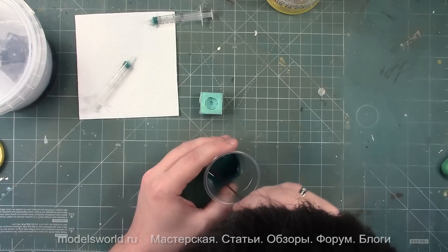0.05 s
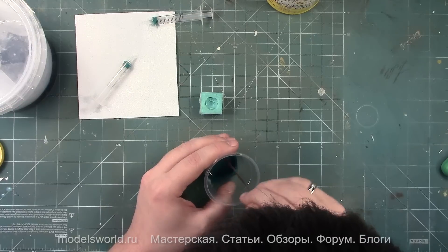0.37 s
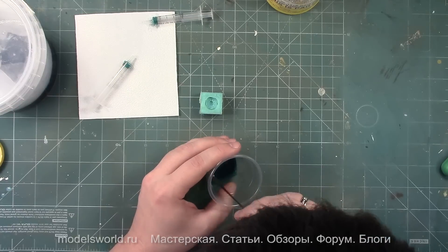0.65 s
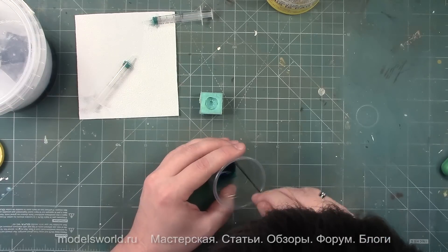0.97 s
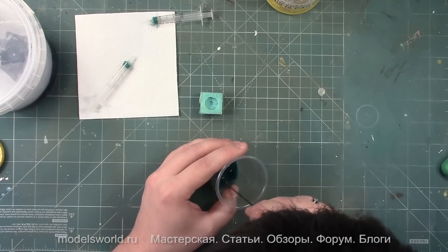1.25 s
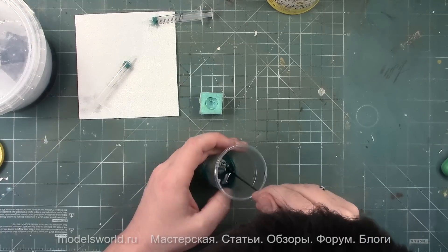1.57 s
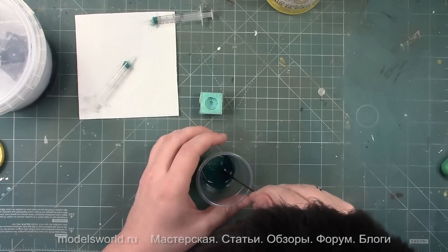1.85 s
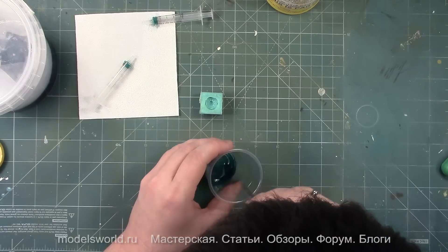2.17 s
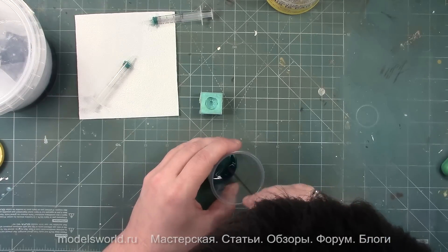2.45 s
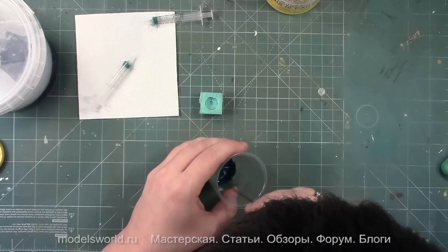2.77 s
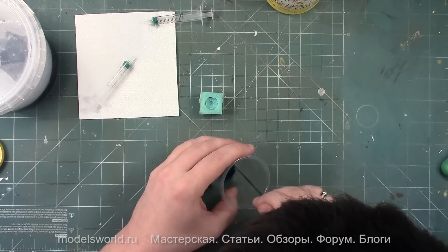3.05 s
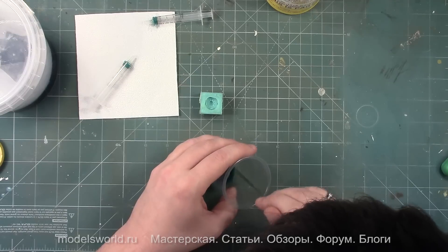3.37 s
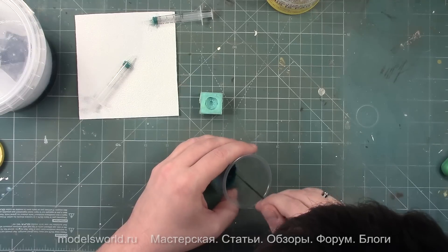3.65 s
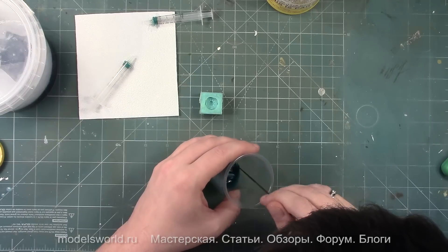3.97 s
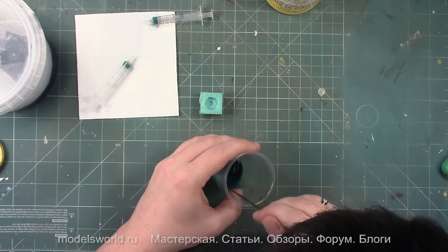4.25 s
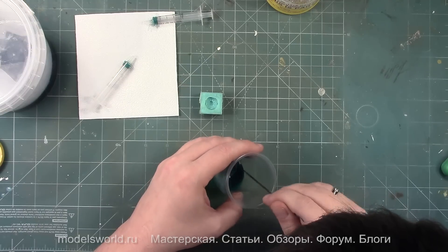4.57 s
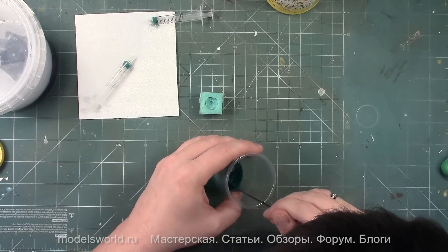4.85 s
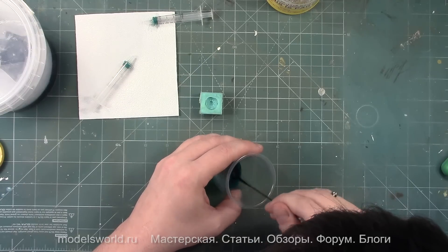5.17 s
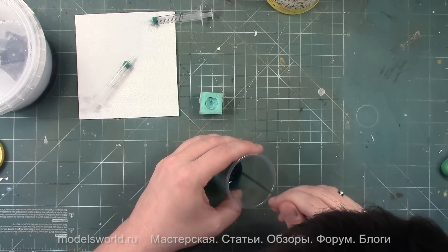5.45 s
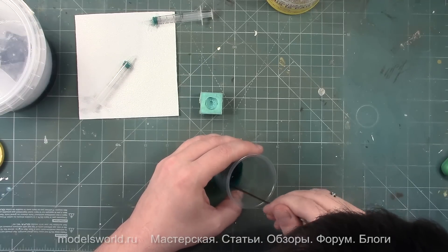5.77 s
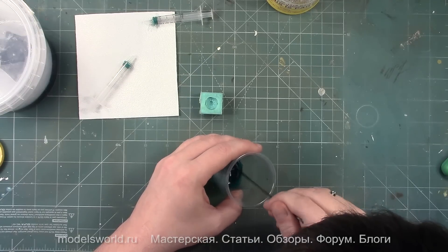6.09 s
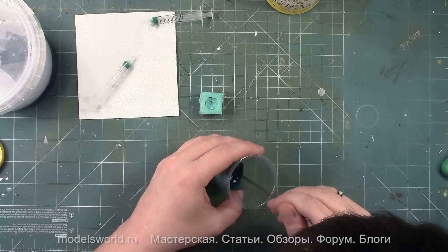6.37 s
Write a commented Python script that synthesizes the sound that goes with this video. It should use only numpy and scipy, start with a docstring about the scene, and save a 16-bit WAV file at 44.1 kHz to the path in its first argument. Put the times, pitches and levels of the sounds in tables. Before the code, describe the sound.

Close, uneven taps and short scrapes of a stick stirring liquid in a flimsy plastic cup, whose wall snaps a few times.

```python
"""Over a faint room rumble, a thin stick knocks and scrapes as it stirs a little liquid in a thin plastic cup.
The cup is hand-held above a worktable in a small room. Each turn drags along the wall in tiny slips and
knocks against it; wall and base ring briefly, with more thump when the stick bears on the base. The cup
bumps the table; the wall snaps and squeaks a few times. The microphone is close and nearly mono,
with the room's short tail behind the cup."""
import sys
import numpy as np
from scipy import signal
from scipy.fft import rfft, irfft, next_fast_len
from scipy.io import wavfile

SR = 44100
rng = np.random.default_rng(int(sys.argv[2]) if len(sys.argv) > 2 else 0)


def store_pcm(level_fs):
    """Save levels as 16-bit WAV."""
    pcm = np.round(np.clip(level_fs, -1, 1) * 32767).astype(np.int16)
    wavfile.write(sys.argv[1], SR, np.atleast_2d(pcm).T)


N = 287661
TOP_HZ = 16000
HIT_GAIN = np.sqrt(SR / 100)  # turns unit energy into unit rms over 10 ms


def undb(db):
    """Decibels to gain."""
    return 10 ** (np.asarray(db) / 20)


def unit(x):
    """Scale to an energy of one."""
    return x / np.sqrt(np.sum(x ** 2) + 1e-18)


def fade(t, t60):
    """Exponential decay, 60 dB down after t60."""
    return np.exp(-np.log(1000) * t / t60)


def noise_burst(t, t60):
    """Decaying noise with an energy of one."""
    return unit(rng.standard_normal(len(t)) * fade(t, t60))


def peak(x, hz, q):
    """One resonance."""
    return signal.lfilter(*signal.iirpeak(hz, q, fs=SR), x)


def colour(x, spectrum):
    """Filter x by a curve of (f/Hz, gain/dB) points on a log-frequency axis."""
    hz, db = np.transpose(spectrum)
    bins_hz = np.maximum(np.fft.rfftfreq(len(x), 1 / SR), 1)
    return irfft(rfft(x) * undb(np.interp(np.log(bins_hz), np.log(hz), db)), len(x))


def add(track, s, x):
    """Mix x into the track from time s on."""
    i = max(int(s * SR), 0)
    track[i:i + len(x)] += x[:max(len(track) - i, 0)]


# the quiet room at the microphone: f/Hz, relative level/dB
ROOM_TONE = [(45, -15), (80, -23), (330, -25), (520, -11.5), (1400, 4), (14000, -45)]
def room_tone(rms_db=-56.5):
    """Faint rumble and hiss of the room."""
    noise = colour(rng.standard_normal(next_fast_len(N)), ROOM_TONE)[:N]
    return unit(noise) * np.sqrt(N) * undb(rms_db)


# modes of the cup, heard close: f/Hz, level/dB
CUP_MODES = [(350, -12), (476, -1.5), (722, 2), (925, 1.5), (1130, -0.5), (1260, 2), (1410, 2.5),
             (1520, 1.5), (1700, 1.5), (2020, 2.5), (2895, 4), (3250, -0.5)]
def cup_ring(t60, crack_db, crack_t60, detune=0.02, scatter_db=3):
    """One tap rings the cup's modes, weighted anew at every spot, and a crack of many damped ones."""
    t = np.arange(SR // 10) / SR
    hz, db = np.transpose(CUP_MODES)[:, :, None]
    shift, weight, polarity = rng.standard_normal((3, len(CUP_MODES), 1))
    ring_s = t60 * (hz / 1000) ** -.6  # t60 holds at 1 kHz; plastic damps higher modes sooner
    modes = np.sin(2 * np.pi * hz * (1 + detune * shift) * t) * fade(t, ring_s) / np.sqrt(ring_s)
    ring = np.sum(np.sign(polarity) * undb(db + scatter_db * weight) * modes, axis=0)
    return unit(ring) + undb(crack_db) * noise_burst(t, crack_t60)


def room_tail(x, t60):
    """The room stores the energy of x and leaks it as diffuse noise."""
    stored = signal.lfilter([1], [1, -fade(2 / SR, t60)], x ** 2)
    return np.sqrt(stored) * rng.standard_normal(len(x))


# borders of the cup's four registers, from low to high base, wall, edge and tick: f/Hz
BORDERS = [285, 800, 2400, 6500, 15000]
REGISTER_BANDS = [signal.butter(5, pair, "band", fs=SR, output="sos") for pair in zip(BORDERS, BORDERS[1:])]
# the room's tail at the close microphone, a row per register: t60/s, level over direct sound/dB
TAILS = [(0.34, -9.5), (0.22, -6.5), (0.36, -10), (0.46, -11)]
def registers(x, spot_hz, levels_db, spot_q, tail_db=0, base_hz=470, base_q=0.74,
              edge_hz=3400, edge_q=0.86, tick_soft_hz=18000):
    """Share a vibration between base, wall, edge and tick, and let each sound into the room."""
    x = np.pad(x, (0, SR // 3))
    # a soft contact is a longer push: the weaker its tick, the less it holds of the very top
    cut_hz = np.clip(tick_soft_hz * undb((levels_db[3] - levels_db[2]) / 2), BORDERS[3] / 2, TOP_HZ)
    shapes = (lambda v: peak(v, base_hz, base_q),
              lambda v: peak(peak(v, spot_hz, spot_q), spot_hz, 0.99),  # pitch of the touched spot
              lambda v: peak(peak(v, edge_hz, edge_q), edge_hz, edge_q),
              lambda v: signal.lfilter(*signal.butter(4, cut_hz, fs=SR), v))
    out = 0
    for shape, sos, db, (t60, wet_db) in zip(shapes, REGISTER_BANDS, levels_db, TAILS):
        direct, diffuse = shape(signal.sosfilt(sos, np.array([x, room_tail(x, t60)])))
        out += undb(db) * (rng.choice([-1, 1]) * unit(direct) + undb(wet_db + tail_db) * unit(diffuse))
    return out


def slips(seconds, per_s, spread_db, catch_db=2.5):
    """Stick-slip: uneven tiny releases that come in clumps, strongest in the middle of the stroke."""
    n = max(int(seconds * SR), 2)
    knots = np.arange(0, n, SR // 200)
    grip = np.interp(np.arange(n), knots, rng.standard_normal(len(knots)))
    size = undb(spread_db * rng.standard_normal(n) + catch_db * grip) * rng.choice([-1, 1], n)
    released = rng.random(n) < per_s / SR
    return size * released * np.sin(np.pi * np.arange(n) / n) ** 0.49


def blow(cling, scuff_s, scuff=0.76, chatter=0.61, chatter_s=.0018):
    """The stick scuffs the wall, hits it and bounces twice; clinging strengthens scuff and bounces."""
    ring = cup_ring(t60=0.021, crack_db=1.0, crack_t60=0.01)
    out = np.zeros(2 * len(ring))
    push = unit(slips(2 * scuff_s, per_s=4000, spread_db=-0.5))
    add(out, 0, cling * scuff * signal.fftconvolve(push, ring))
    add(out, scuff_s, ring)
    for bounce, delay in enumerate(np.cumsum(chatter_s * (.5 + rng.random(2))), start=1):
        add(out, scuff_s + delay, (cling * chatter) ** bounce * ring)
    return out


# top treble of knocks and drags, coming and going as the stick works round the cup: t/s, gain/dB
SHEEN = [(0, -0.5), (1.1, 2), (2.8, 5), (3.3, -3), (3.6, 7), (3.85, 0.5), (4.1, -8), (4.55, -2.5),
         (5.3, 8.5), (5.85, -5.5), (6.4, 9)]
def sheen(s):
    """Extra level of the tick register at time s, in dB."""
    return np.interp(s, *np.transpose(SHEEN))


# stick on the cup wall, close to the microphone:
# t/s, wall level/dB, spot f/Hz, hardness (edge over wall)/dB, base over wall/dB
KNOCKS = [(0.0113, -42, 1720, 0.5, -16.5), (0.176, -42, 1590, -10, -12), (0.1889, -42.5, 1730, 4.5, -25),
          (0.2324, -51.5, 1700, 7, -12), (0.321, -30, 1470, -2.5, -22.5), (0.3356, -33.5, 1490, -9, -23.5),
          (0.3484, -42, 1640, 13, -10.5), (0.5437, -32, 1870, -1.5, -21.5), (0.588, -42, 1550, -8.5, -37),
          (0.675, -43.5, 1740, -15, -31.5), (0.749, -29.5, 1820, -1, -18.5),
          (0.7702, -36.5, 2040, -0.5, -17), (1.057, -38, 1620, 0.5, -27), (1.079, -39, 1580, -8, -10),
          (1.129, -41.5, 1630, 9.5, -14), (1.1631, -31.5, 1440, -8.5, -8.5),
          (1.3127, -34.5, 1220, -13, -10.5), (1.3318, -31, 1630, -4.5, -20.5),
          (1.3646, -38.5, 1660, 3.5, -5), (1.531, -28.5, 1710, -6.5, -19), (1.553, -34, 1420, 0.5, -6.5),
          (1.726, -38, 1630, -7.5, -18.5), (2.2984, -38.5, 1610, -4, -38), (2.4067, -40, 1870, -1.5, -27.5),
          (2.626, -34, 1590, -1, -16), (2.654, -29, 1720, 4, -9.5), (2.7734, -39.5, 1770, -3, -23),
          (2.8247, -29, 1650, -0.5, -37.5), (2.9495, -35.5, 1570, -5.5, -20.5),
          (3.021, -41.5, 1540, 6, -16), (3.1405, -36.5, 1300, 2, -19), (3.2135, -37.5, 1460, -1.5, -4),
          (3.2214, -35, 1610, -2.5, -14.5), (3.228, -40, 1550, -5, -19), (3.327, -38, 1890, -3, -12),
          (3.4195, -32, 1410, 7, -10.5), (3.522, -33.5, 1410, -2.5, -10.5), (3.581, -31, 1750, 6.5, -15.5),
          (3.7164, -39, 1420, 1.5, -17.5), (3.7677, -36, 1430, -1.5, -10), (3.7923, -44.5, 1290, 5, 5.5),
          (3.9092, -28, 1750, -7.5, -5), (3.948, -29, 1310, -21, -14), (3.978, -39, 1100, -10, -1.5),
          (4.092, -41, 1120, -3.5, -18), (4.104, -31, 1540, -11, -24), (4.1128, -32.5, 1790, -1.5, -20),
          (4.1506, -40.5, 1560, -6, -11), (4.4741, -36.5, 1160, -4, -7), (4.5479, -25, 1850, -4, -15.5),
          (4.7466, -32, 1740, -4, -18), (4.9223, -32.5, 1480, 1.5, -21), (4.9398, -35.5, 1830, 4, -17),
          (5.0545, -29.5, 1690, -4, -4), (5.101, -34, 1430, -1.5, -13.5), (5.1374, -35, 1510, 2.5, -6.5),
          (5.234, -41.5, 1290, -9, -6), (5.2804, -26, 1430, -5, -6.5), (5.316, -31, 1800, -1.5, -8),
          (5.432, -30, 1310, -9.5, -8), (5.4373, -32, 1230, -15.5, -8.5), (5.497, -32, 1610, -6, -3.5),
          (5.6121, -31, 1000, -9, -7), (5.6862, -31.5, 1680, -13.5, -5.5), (5.7957, -32.5, 1050, -4, -6.5),
          (5.871, -33.5, 1370, -10.5, -4), (5.9823, -30.5, 1280, -10, -6), (6.0605, -27, 1640, -11.5, -9.5),
          (6.215, -25.5, 1650, -2, -11), (6.409, -24, 1780, -3, -16.5)]
def knocks(base_db=-1.7, tick_db=-18, tick_growth=1.33, scuff_s=0.0053, lead_s=.0004, cling_db=-21):
    """Hardness sets a knock's edge and tick, pressure its thump and scuff; each spot has its own pitch."""
    out = np.zeros(N)
    for s, db, spot_hz, hardness, base in KNOCKS:
        cling = 1 / (1 + undb(cling_db - base))  # a pressed stick clings, a free one taps cleanly
        tick = tick_db + tick_growth * hardness + sheen(s)
        levels = db + np.array([base + base_db, 0, hardness, tick])
        spot_q = 0.75 * undb(-base / 3)  # a tap clear of the base rings more purely
        add(out, s - scuff_s - lead_s, HIT_GAIN * registers(blow(cling, scuff_s), spot_hz, levels, spot_q))
    return out


def pressure(s, reach_s=0.13):
    """How firmly the stick bears on the base at time s, as in the knocks nearby: dB of base over wall."""
    when, *_, base = np.transpose(KNOCKS)
    return np.average(base, weights=1 / (1 + ((s - when) / reach_s) ** 2) ** 2)


# scrapes inside the cup, and the hollow ring after the snap at 2.83 s:
# start t/s, end t/s, wall level/dB, hardness (edge over wall)/dB
DRAGS = [(0.056, 0.124, -42, 1.5), (0.285, 0.323, -42.5, 2.5), (0.496, 0.538, -42.5, 2),
         (0.698, 0.742, -38, 0.5), (0.886, 0.958, -40, 0), (1.093, 1.148, -39, 0.5),
         (1.267, 1.285, -45, -1), (1.299, 1.317, -36, -1), (1.351, 1.375, -42.5, 1.5),
         (1.456, 1.476, -44, -3.5), (1.496, 1.522, -38, -2), (1.885, 1.929, -44, 1.5),
         (2.198, 2.219, -44, 1.5), (2.249, 2.31, -44.5, 1.5), (2.431, 2.479, -38, -0.5),
         (2.632, 2.649, -34.5, 0.5), (2.833, 2.938, -46, -20), (3.004, 3.022, -47, -1.5),
         (3.165, 3.21, -43, -3.5), (3.369, 3.423, -42, -2.5), (3.559, 3.58, -32, -0.5),
         (3.91, 3.931, -33, -10), (4.158, 4.173, -38, -2.5), (4.307, 4.355, -42, 2.5),
         (4.44, 4.468, -38.5, -8.5), (4.536, 4.559, -37, 3.5), (4.672, 4.701, -43, 0.5),
         (4.718, 4.777, -45.5, 1.5), (4.86, 4.877, -40.5, -7), (4.903, 4.956, -40, 1.5),
         (5.056, 5.16, -42.5, -2), (5.261, 5.297, -38.5, -5.5), (5.456, 5.483, -42, 0.5),
         (5.644, 5.669, -44, 1.5), (5.828, 5.86, -45, 3.5), (6.01, 6.057, -44, 3.5),
         (6.149, 6.165, -39.5, -8.5), (6.206, 6.233, -30, -3), (6.347, 6.365, -44, -8),
         (6.388, 6.413, -36, -4)]
def drags(base_db=-5, tick_db=-16, tick_growth=2.1, deep_hz=1300, rise_per_db=0.02, quick_s=0.032):
    """Scrapes on the wet wall, and one hollow ring; every slip taps the cup, and sharper slips hiss more."""
    out = np.zeros(N)
    for start, end, db, hardness in DRAGS:
        base = pressure((start + end) / 2)
        push = slips(end - start, per_s=1900, spread_db=6.5)
        scrape = signal.fftconvolve(push, cup_ring(t60=0.024, crack_db=5.5, crack_t60=0.0033))
        tick = tick_db + tick_growth * hardness + sheen(start)
        levels = db + np.array([base + base_db, 0, hardness, tick])
        spot_hz = deep_hz * (1 + rise_per_db * (hardness - base))  # light, bright strokes sound higher
        spot_q = 0.81 * undb(-min(hardness, 0))  # the duller the sound, the narrower its pitch
        edge_q = np.sqrt(abs(end - start) / quick_s)  # a slow rub keeps to the edge's resonance
        sound = registers(scrape, spot_hz, levels, spot_q, edge_hz=2930, edge_q=edge_q, tick_soft_hz=17200)
        add(out, start, np.sqrt(len(push)) * sound)
    return out


def wet_ticks(per_s=11, mean_db=-50, spread_db=4, centre_hz=1400):
    """Faint ticks of the stirred liquid and of light touches, at random times."""
    out = np.zeros(N)
    for when, size, spot in rng.random((int(per_s * N / SR), 3)):
        s = when * N / SR
        levels = mean_db + spread_db * (2 * size - 1) + np.array([pressure(s) - 13, -1.5, -6, -28])
        ring = cup_ring(t60=0.025, crack_db=-2, crack_t60=0.0088)
        add(out, s, HIT_GAIN * registers(ring, centre_hz * 2 ** (spot - .5), levels, spot_q=3))
    return out


# the cup jolts the worktable under it when the stick pushes down: t/s, level/dB
BUMPS = [(0.33, -68), (0.535, -60), (0.753, -58), (1.076, -54.5), (1.161, -60.5), (1.312, -61),
         (1.356, -58.5), (1.549, -61.5), (2.652, -64.5), (3.01, -64), (3.213, -63), (3.573, -55),
         (3.785, -62), (3.91, -46.5), (4.33, -65), (5.133, -59.5), (5.273, -58), (5.307, -53), (5.429, -51),
         (6.221, -61.5), (6.403, -51)]
def bumps(hz=195, detune=0.06, t60=0.13, attack_s=0.0044, second_db=-2):
    """Cup, hand and table rock together on a close pair of low modes: a hollow bump."""
    out, t = np.zeros(N), np.arange(SR // 5) / SR
    envelope = fade(t, t60) * (1 - np.exp(-t / attack_s)) ** 2
    for s, db in BUMPS:
        first_hz, second_hz = hz * (1 + detune * rng.uniform(-1, 1, 2))
        ring = np.sin(2 * np.pi * first_hz * t) + undb(second_db) * np.sin(2 * np.pi * second_hz * t)
        add(out, s, undb(db) * HIT_GAIN * unit(ring * envelope))
    return out


# the wall snaps, close up, as the hand shifts its grip or the stick flexes it:
# t/s, wall level/dB, f/Hz, resonance Q, edge over wall/dB, tick over wall/dB, extra tail/dB
SNAPS = [(1.759, -17, 1850, 2, -9.5, -12.5, -11), (1.7768, -29.5, 1380, 1.3, 5.5, -1.5, 5),
         (1.808, -45, 1500, 1.2, 16, 20.5, -0.5), (2.06, -32.5, 1520, 2.2, -8, -23, 4),
         (2.081, -37.5, 1280, 4.7, 4, 10, -0.5), (2.8282, -22.5, 1500, 10.6, -5.5, -28, -3)]
def snaps(lead_s=0.00037, base_db=-23):
    """The thin wall buckles and springs back with short cracks, some bright, some ringing at one pitch."""
    out = np.zeros(N)
    for s, db, spot_hz, spot_q, edge, tick, tail_db in SNAPS:
        ring = cup_ring(t60=0.014, crack_db=3, crack_t60=0.011)
        levels = db + np.array([base_db, 0, edge, tick])
        crack = registers(ring, spot_hz, levels, spot_q, tail_db, base_hz=760, base_q=3.7)
        add(out, s - lead_s, HIT_GAIN * crack)
    return out


# the tip squeaks inside the cup: start t/s, end t/s, f/Hz, rms level/dB
SQUEAKS = [(1.888, 1.94, 2005, -44), (2.893, 2.917, 3130, -54)]
def squeaks(rise=0.022, jitter=0.15, tail_t60=0.36, tail_db=-9):
    """Even stick-slip sings a short, slightly rising note that lingers in the room."""
    out, t = np.zeros(N), np.arange(SR // 3) / SR
    for start, end, hz, db in SQUEAKS:
        progress = np.linspace(0, 1, int((end - start) * SR))
        pitch = hz * (1 + rise * progress + jitter * rng.standard_normal(len(progress)))
        note = 2 * undb(db) * np.sin(np.pi * progress) * np.sin(2 * np.pi * np.cumsum(pitch) / SR)
        add(out, start, note)
        add(out, start, undb(tail_db) * signal.fftconvolve(note, noise_burst(t, tail_t60)))
    return out


# narrow peaks and dips in the treble: f/Hz, gain/dB
TREBLE_COLOUR = [(3080, -4.5), (3950, 1.5), (4300, -6), (4900, 3), (5370, 1.5), (5950, 4), (6330, 1.5),
                 (6900, -2), (8000, 3.5), (10500, 2.5)]
def treble_colour(x, width_hz=210):
    """Narrow peaks and dips colour the treble of the knocks, scrapes, snaps and wet ticks."""
    for hz, db in TREBLE_COLOUR:
        x = x + (undb(db) - 1) * peak(x, hz, q=hz / width_hz * undb(db / 2))
    return x


def reflections(x, gain_db=-4, t60=0.3, band_hz=(186, 1700)):
    """Table and nearby walls give a dull pattern of reflections that colours every contact alike."""
    t = np.arange(SR // 2) / SR
    dull = signal.butter(1, band_hz, "band", fs=SR, output="sos")
    echoes = signal.sosfilt(dull, noise_burst(t, t60))
    return undb(gain_db) * signal.fftconvolve(x, echoes)[:N]


# low modes of the worktable and the room around it: f/Hz
LOW_MODES = [188, 221, 312, 382, 474, 630, 722, 937]
def lingering_modes(x, t60=0.99, gain_db=3):
    """A few narrow low modes pick up each contact and hum on faintly."""
    return undb(gain_db) * sum(peak(x, hz, q=np.pi * hz * t60 / np.log(1000)) for hz in LOW_MODES)


# stereo width at the microphone: f/Hz, side over mid/dB
WIDTH = [(80, -13), (350, -25), (1400, -39), (2800, -30), (5000, -24)]
def scene():
    """Cup close and central; only a trace of near reflections differs between left and right."""
    cup = treble_colour(knocks() + drags() + snaps() + wet_ticks()) + squeaks() + bumps()
    mid = cup + reflections(cup) + lingering_modes(cup) + room_tone()
    near_echoes = unit(rng.standard_normal(SR // 40))
    side = colour(signal.fftconvolve(mid, near_echoes)[:N], WIDTH)
    return np.array([mid + side, mid - side])


def record(dry):
    """The recorder cuts the treble steeply above TOP_HZ."""
    return signal.sosfilt(signal.ellip(8, .2, 70, TOP_HZ, fs=SR, output="sos"), dry)


dry = scene()
out = record(dry)
store_pcm(out)
```